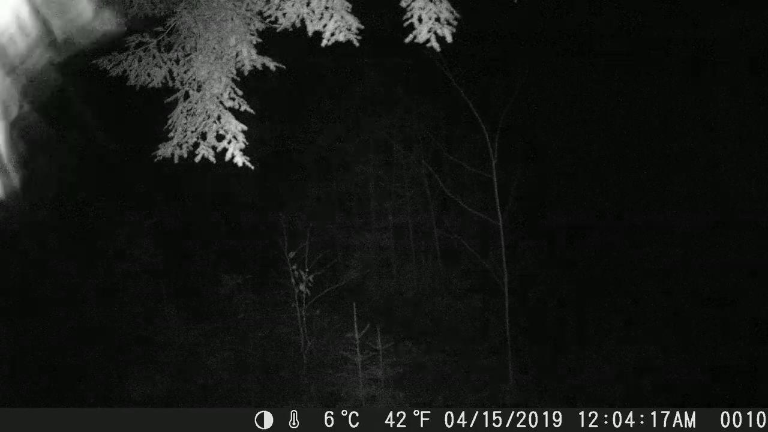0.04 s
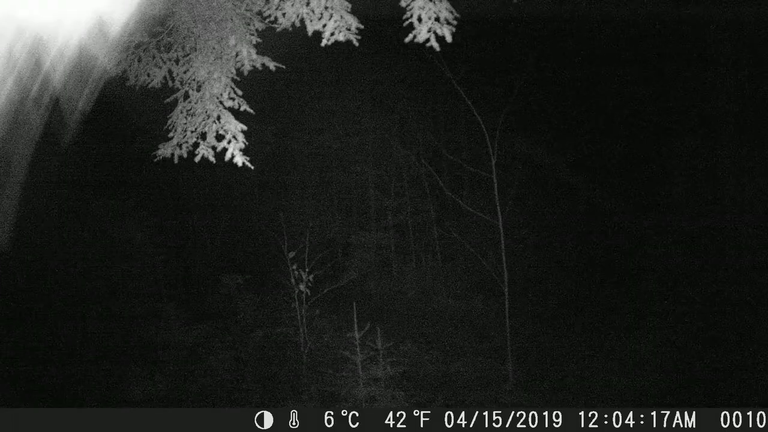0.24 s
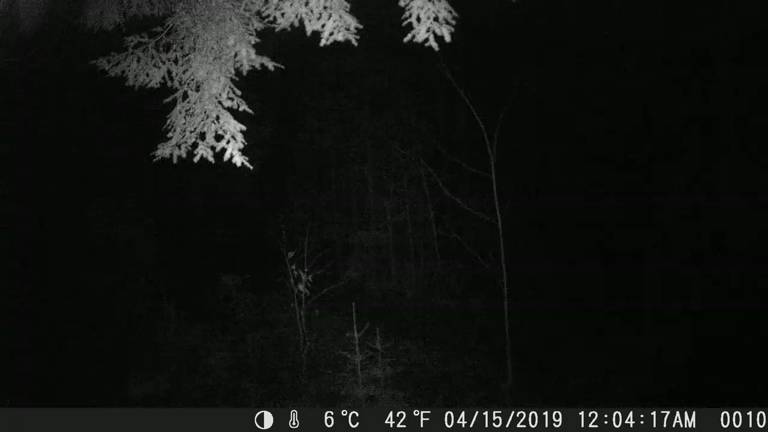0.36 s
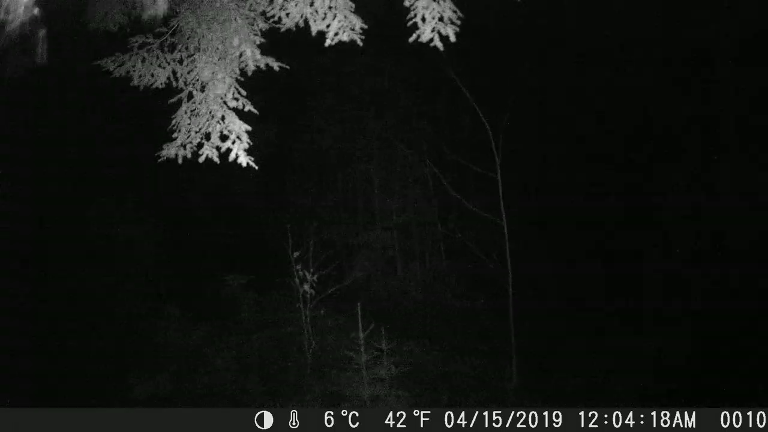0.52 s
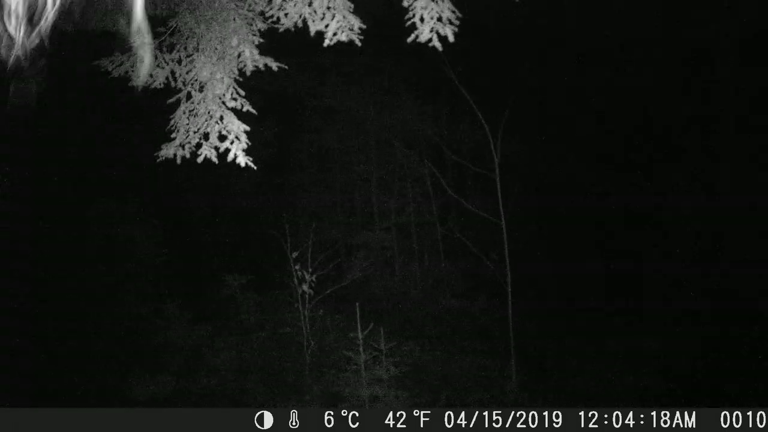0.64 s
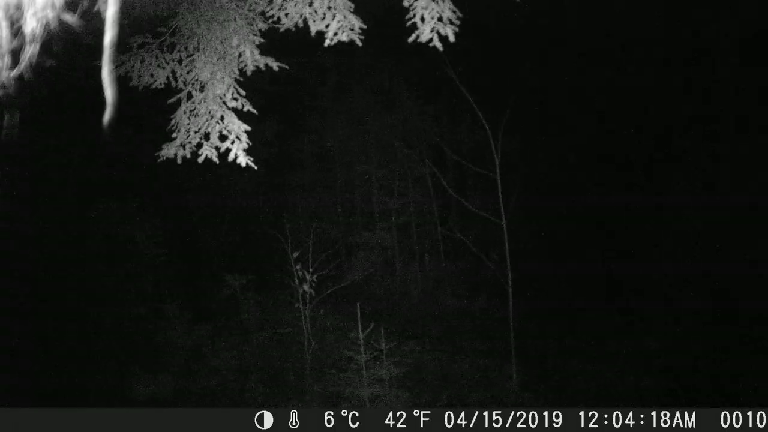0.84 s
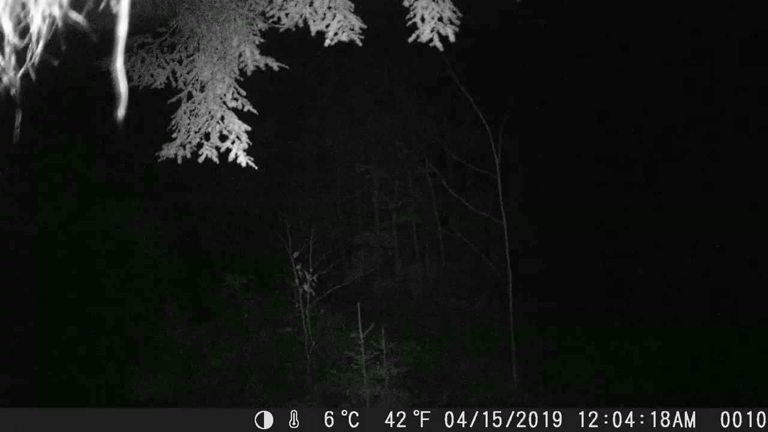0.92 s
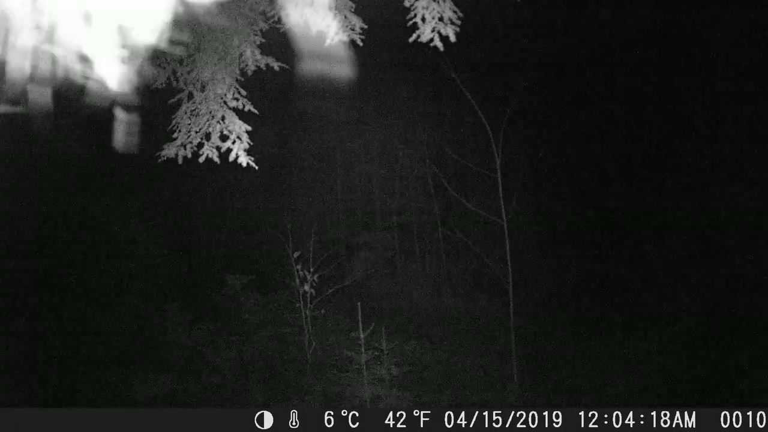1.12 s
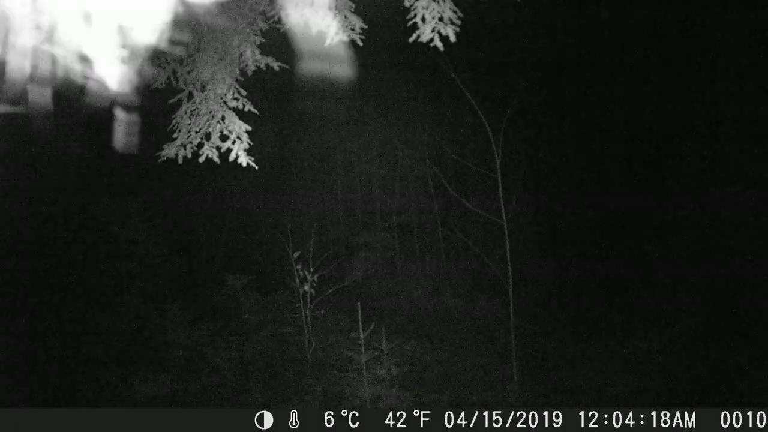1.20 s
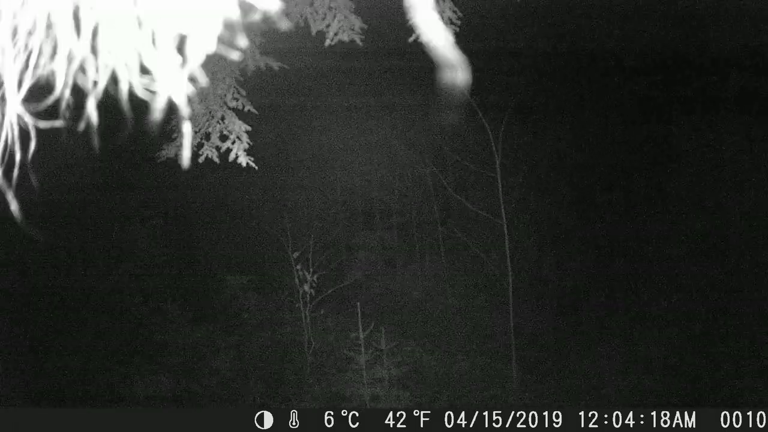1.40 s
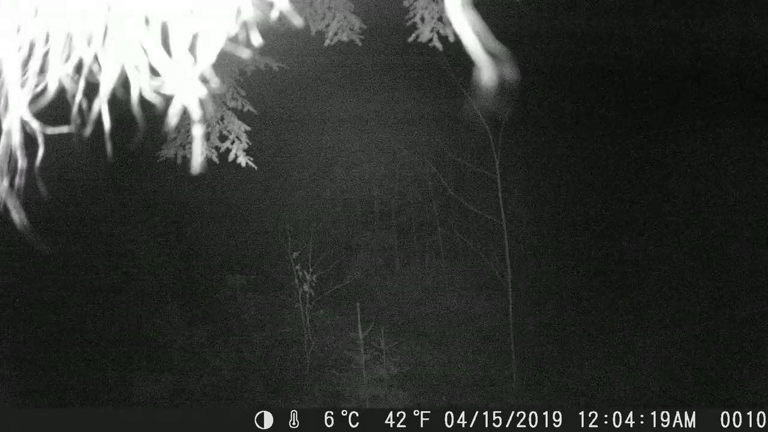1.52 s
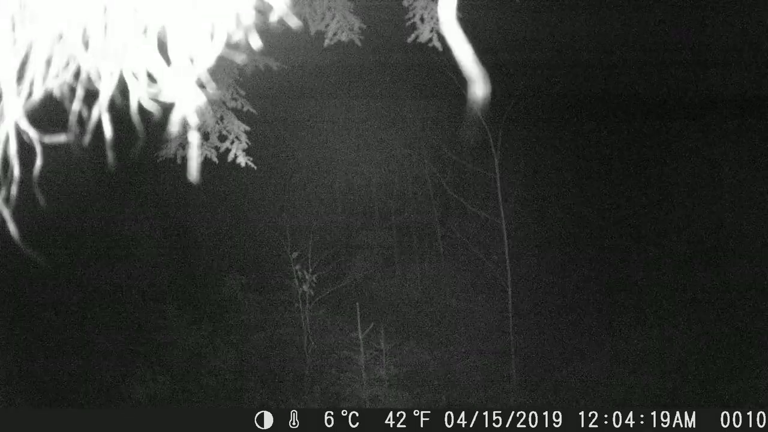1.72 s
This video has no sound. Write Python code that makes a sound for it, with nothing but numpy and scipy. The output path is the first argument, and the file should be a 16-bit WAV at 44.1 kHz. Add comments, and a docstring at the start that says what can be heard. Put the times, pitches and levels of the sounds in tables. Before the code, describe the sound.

An animal rubs its coat on a plastic camera case outdoors at night, very close to the microphone: low shudder, rustle, quick scrapes and tiny squeaks, one heavy thud, then sparse faint hair ticks over rumble and hiss.

```python
"""A low shudder, a soft thud and a rustle of hair come first, then one heavy shove.
An animal rubs its coat along a plastic camera case strapped up outdoors at night, right at the microphone.
Hairs are dense clicks and noise bursts coloured by the case; scrapes ring its resonances, squeaks are sagging
sines. Nudges ring the modes of the mount and the shove is a rising low tone.
Behind them lie a faint rumble of deep noise and the microphone's own hiss."""
import sys
import numpy as np
from scipy import signal
from scipy.fft import rfft, irfft
from scipy.io import wavfile

SR = 44100
rng = np.random.default_rng(int(sys.argv[2]) if len(sys.argv) > 2 else 0)


def digitize_waveform(pressure):
    """Quantize a signal to 16-bit integers and store it at the path in sys.argv[1].

    Rows of a 2-D input are taken as channels; values are limited to [-1, 1].
    """
    field = np.atleast_2d(pressure).T
    bounded = np.clip(field, -1, 1)
    quanta = np.round(bounded * 32767).astype(np.int16)
    wavfile.write(sys.argv[1], SR, quanta)


N = 77175  # samples, 1.75 s

# pressure of the coat on the case: time_s, level_db
RUB_PRESSURE = [(0, -60), (.08, -56), (.145, -50.5), (.17, -53.5), (.225, -49.5), (.265, -41.5),
                (.29, -55.5), (.335, -56), (.385, -63), (.45, -71), (.495, -56.5), (.525, -66), (.6, -64.5),
                (.74, -72.5), (.95, -70), (1.02, -67), (1.09, -63.5), (1.17, -73), (1.23, -69.5),
                (1.255, -59.5), (1.29, -64), (1.32, -70), (1.45, -69.5), (1.485, -61), (1.515, -71.5),
                (1.61, -67), (1.64, -74), (1.75, -72.5)]
# colour of slipping hairs heard through the case: frequency_hz, gain_db
CASE_COLOUR = [(60, -40), (230, -18.5), (340, -9.5), (460, -5), (570, 2.5), (780, -2.5), (1100, 3),
               (1520, 5.5), (1780, -7.5), (2080, 0.5), (2280, -4), (2520, 2), (2850, -5.5), (3200, -15),
               (3500, -9.5), (4400, -24), (5200, -30), (6450, -33), (6950, -24.5), (7500, -37.5),
               (8050, -25.5), (8800, -49.5)]
# level of the swish of the first fast stroke: time_s, level_db
SWISH_LEVEL = [(0, -58.5), (.09, -57), (.12, -52.5), (.148, -46.5), (.172, -54.5), (.22, -67), (.33, -84),
               (.45, -99.5)]
# level of the fine sizzle of hair tips: time_s, level_db
SIZZLE_LEVEL = [(0, -74.5), (.09, -75), (.15, -68), (.2, -77.5), (.245, -67.5), (.275, -60), (.295, -81.5),
                (.34, -78), (.42, -98)]
# colour of the sizzle: frequency_hz, gain_db
SIZZLE_COLOUR = [(5500, -22), (6500, -20), (6900, 8.5), (7500, 2.5), (8050, 1), (8500, -25.5),
                 (9200, -27.5)]
# tufts that snag and let go: start_s, decay_s, level_db, tilt_db_per_octave
SNAGS = [(0.066, 0.0057, -54.5, 10.5), (.1505, 0.00091, -47, -7), (0.1614, 0.00088, -54.5, 4),
         (0.317, 0.015, -44.5, -13.5), (0.334, 0.0027, -60, -10.5), (0.403, 0.0036, -46.5, 3),
         (0.416, 0.0073, -53, 3), (0.461, 0.0015, -54.5, 4.5), (0.4794, 0.01, -58.5, 4.5),
         (.498, 0.0031, -64, 4), (0.532, .004, -53, 2), (0.5566, 0.012, -54.5, -7.5),
         (.623, 0.019, -57.5, -7.5), (.684, 0.0043, -49, -7), (0.774, 0.013, -58, -3.5),
         (0.884, .004, -64.5, 8), (1.1871, 0.0057, -47.5, -0.5), (1.2133, 0.0038, -55, -0.5),
         (1.285, 0.002, -65, 13), (1.3752, 0.0028, -47.5, 1), (1.4931, 0.0016, -58, 1),
         (1.523, 0.0034, -69, 12), (1.643, 0.002, -80, -5)]
# bright crackles of stiff hairs: start_s, decay_s, pitch_hz, level_db
CRACKLES = [(0.401, 0.0025, 3260, -44), (0.486, 0.014, 3500, -61), (.499, 0.0099, 3400, -62),
            (0.531, 0.0038, 3550, -59), (0.574, 0.018, 3520, -70), (.7752, 0.0027, 2430, -54),
            (.988, 0.0096, 7200, -72.5), (1.188, 0.0023, 3400, -61.5), (1.376, 0.0064, 2570, -54)]
# hard scrapes that ring the case: start_s, decay_s, level_db
SCRAPES = [(0.2332, 0.0086, -39.5), (0.2458, 0.012, -35.5), (0.2603, 0.0089, -37), (0.2681, 0.0022, -31.5),
           (0.276, 0.009, -41.5), (0.299, .016, -51)]
# resonances of the case: pitch_hz, width_hz, relative_level_db
CASE_MODES = [(744, 20, 6.5), (919, 18, -1), (1102, 22, 8.5), (1300, 97, -7.5), (1424, 50, -1.5),
              (1560, 70, -12.5), (2272, 110, -8), (2980, 50, -9.5)]
# stick-slip squeaks: start_s, length_s, starting_pitch_hz, share_of_pitch_lost (0-1), level_db
SQUEAKS = [(.0975, .011, 757, 0.22, -36.5), (0.1757, 0.0097, 735, 0.23, -38.5),
           (0.2321, 0.0134, 905, 0.01, -33.5), (0.2361, 0.017, 1093, 0, -29.5),
           (0.2654, 0.012, 1070, 0, -29.5), (1.473, 0.014, 719, .15, -58)]
# soft nudges on the mount: start_s, contact_s, force_db
NUDGES = [(.002, 0.0049, -43.5), (0.1182, 0.0028, -48), (0.1657, 0.0053, -33.5), (0.2129, 0.0039, -30),
          (0.2425, 0.0087, -25.5), (0.2629, 0.0065, -27), (0.344, 0.0086, -36), (.775, 0.0036, -58.5),
          (1.38, 0.0031, -53)]
# ringing modes of the mount: pitch_hz, t60_s, relative_level_db
MOUNT_MODES = [(60.3, .4, -12), (75.3, 0.83, 1), (91.4, .28, 1.5), (128.7, 0.26, 3.5), (193.3, .22, -12.5),
               (211.6, 0.18, -12.5)]
# low shudder of the rubbed mount: time_s, level_db
SHUDDER_LEVEL = [(0, -43), (.14, -46.5), (.3, -40.5), (.45, -65), (.7, -56), (.9, -65.5), (1.05, -55.5),
                 (1.3, -63), (1.42, -56.5), (1.75, -72.5)]
# colour of the shudder: frequency_hz, gain_db
SHUDDER_COLOUR = [(30, -23), (70, 2.5), (100, -1), (135, 4.5), (165, -15.5), (210, -11.5), (280, -35),
                  (600, -68)]
# level of the deep rumble, which swells as the camera sways: time_s, level_db
RUMBLE_LEVEL = [(0, -61), (.2, -45.5), (.32, -38), (.4, -46.5), (.51, -43), (.62, -54), (1.3, -54.5),
                (1.4, -47.5), (1.5, -52), (1.75, -52)]
# colour of the rumble: frequency_hz, gain_db
RUMBLE_COLOUR = [(8, 2), (20, 3.5), (40, -4.5), (70, -11.5), (150, -24), (300, -34), (1000, -61.5)]
# colour of the microphone's hiss: frequency_hz, gain_db
HISS_COLOUR = [(200, 17), (450, 9.5), (600, 8), (800, 0.5), (1500, 16), (1800, -0.5), (2500, -25.5),
               (3200, -29), (3600, -40), (4600, -14), (6400, -14), (7000, -2), (8100, -19), (9000, -43)]

SLIPS_PER_S, SLIP_SPREAD_DB, RUB_FLUTTER_DB = 3200, 2, 3.5
SWISH_HZ, SWISH_WIDTH_HZ = 2500, 310  # width of each of two passes
CRACKLE_WIDTH_HZ = 320  # width of each of two passes
SCRAPE_DRY_DB, SCRAPE_SOFT_HZ = -13.5, 2670  # unringing share; hair cushions pitches above
SQUEAK_JITTER, SQUEAK_FLUTTER_DB, SQUEAK_RISE_S = .075, 0.5, 0.00083  # jitter as a share of pitch
# the shove shakes the mount; its pitch rises as the strap tightens
SHOVE_S, SHOVE_DB, SHOVE_ATTACK_S, SHOVE_HOLD_S, SHOVE_RELEASE_S = .2556, -15.5, 0.011, 0.035, 0.023
SLACK_HZ, TIGHT_HZ, TIGHTEN_S, SHOVE_OCTAVE_DB = 62.4, 98.3, 0.034, -19.5
MOUNT_LOW_HZ = 47  # thuds thin out below
HISS_DB = -71.5
NULL_HZ, NULL_WIDTH_HZ = 3160, 110  # the hollow of the case cancels this pitch
TOP_HZ = 8700


def undb(db):
    """Decibels to gain."""
    return 10 ** (np.asarray(db) / 20)


def unit(x):
    """Scale to rms 1."""
    return x / np.sqrt(np.mean(x ** 2) + 1e-30)


def times():
    """Time of every sample in seconds."""
    return np.arange(N) / SR


def fader(rows):
    """Gain along (time_s, level_db) points."""
    return undb(np.interp(times(), *np.array(rows).T))


def colour(x, points, tilt_db=0):
    """Causal filter through (Hz, dB) points, tilted per octave; keeps the power of white noise."""
    size = 8192
    hz, db = np.array(points, float).T
    octave = np.log2(np.maximum(np.arange(size // 2 + 1) * SR / size, 1))
    tilt = tilt_db * np.clip(octave, np.log2(hz[0]), np.log2(hz[-1]))
    gain = undb(np.interp(octave, np.log2(hz), db) + tilt)
    # folding the cepstrum forward gives minimum phase: no sound ahead of its cause
    cepstrum = irfft(np.log(gain))
    cepstrum[1:size // 2] *= 2
    cepstrum[size // 2 + 1:] = 0
    response = irfft(np.exp(rfft(cepstrum)))
    response = response / np.linalg.norm(response)
    return signal.fftconvolve(x, response)[:len(x)]


def noise(points):
    """Steady coloured noise of rms 1, taken after the filter has settled."""
    return unit(colour(rng.standard_normal(2 * N), points)[N:])


def band(x, hz, width):
    """One resonance, gain 1 at its centre."""
    return signal.lfilter(*signal.iirpeak(hz, hz / width, fs=SR), x)


def walk(rate):
    """Random wander with a spread near 1, through `rate` new points per second."""
    return np.interp(times() * rate, np.arange(N), rng.standard_normal(N))


def burst(start, decay):
    """Sudden start and exponential fall."""
    age = times() - start
    return (age >= 0) * np.exp(-np.maximum(age, 0) / decay)


def slips():
    """Dense tiny clicks of single hairs, of uneven size and either sign, at rms 1."""
    size_db = SLIP_SPREAD_DB * np.minimum(rng.exponential(size=N), 4)
    clicks = undb(size_db) * rng.choice([-1, 1], N)
    return unit(clicks * (rng.random(N) < SLIPS_PER_S / SR))


def coat():
    """Hairs slide over the case, swish on the fast stroke, sizzle at the tips and snag in tufts."""
    pressure = fader(RUB_PRESSURE) * undb(RUB_FLUTTER_DB * walk(120))
    rub = colour(slips() * pressure, CASE_COLOUR)

    swish = band(slips(), SWISH_HZ, SWISH_WIDTH_HZ)
    swish = unit(band(swish, SWISH_HZ, SWISH_WIDTH_HZ)) * fader(SWISH_LEVEL)

    tips = slips() * undb(3 * walk(170))
    sizzle = unit(colour(tips, SIZZLE_COLOUR)) * fader(SIZZLE_LEVEL)

    tufts = rng.standard_normal(N)
    snags = 0
    for start, decay, db, tilt in SNAGS:
        snags = snags + colour(tufts * burst(start, decay) * undb(db), CASE_COLOUR, tilt)
    return rub + swish + sizzle + snags


def crackles():
    """Stiff hairs flick off the edge: short clusters of clicks in narrow bright bands."""
    grains = slips()
    out = 0
    for start, decay, hz, db in CRACKLES:
        cluster = band(grains * burst(start, decay), hz, CRACKLE_WIDTH_HZ)
        out = out + undb(db) * band(cluster, hz, CRACKLE_WIDTH_HZ)
    return out * np.sqrt(SR / 2 / CRACKLE_WIDTH_HZ)  # makes up for the narrow band


def scrapes():
    """Hard contact, cushioned by hair, rings the resonances of the plastic."""
    force = slips() * sum(burst(start, decay) * undb(db) for start, decay, db in SCRAPES)
    cushion = signal.butter(4, SCRAPE_SOFT_HZ, fs=SR, output="sos")
    cushioned = signal.sosfilt(cushion, force)
    ring = sum(undb(db) * band(cushioned, hz, width) for hz, width, db in CASE_MODES)
    return unit(ring) * np.std(force) + undb(SCRAPE_DRY_DB) * colour(force, CASE_COLOUR)


def squeaks():
    """A few uneven stick-slip cycles that die away, most of them sagging in pitch."""
    out, t = 0, times()
    for start, length, start_hz, sag, db in SQUEAKS:
        gone = np.clip((t - start) / length, 0, 1)
        hz = start_hz * (1 - sag * gone) * (1 + SQUEAK_JITTER * walk(1200))
        phase = 2 * np.pi * np.cumsum((t > start) * hz) / SR
        rise = np.clip((t - start) / SQUEAK_RISE_S, 0, 1)
        level = undb(db + SQUEAK_FLUTTER_DB * walk(400))
        out = out + rise * (1 - gone ** 3) * level * np.sin(phase)
    return out


def shove():
    """The one heavy thud: a tone with attack, hold and release, rising as the strap tightens."""
    age = np.maximum(times() - SHOVE_S, 0)
    hz = SLACK_HZ + (TIGHT_HZ - SLACK_HZ) * np.minimum(age / TIGHTEN_S, 1)
    phase = 2 * np.pi * np.cumsum(hz * (age > 0)) / SR
    attack = np.sin(np.pi / 2 * np.minimum(age / SHOVE_ATTACK_S, 1)) ** 2
    release = np.exp(-np.maximum(age - SHOVE_HOLD_S, 0) / SHOVE_RELEASE_S)
    tone = np.sin(phase) + undb(SHOVE_OCTAVE_DB) * np.sin(2 * phase)
    return -undb(SHOVE_DB) * attack * release * tone  # first swing is downward


def mount():
    """Soft nudges ring the mount's decaying modes, and the rubbing keeps it shuddering."""
    t = times()
    force = 0
    for start, contact, db in NUDGES:
        push = np.sin(np.pi * np.clip((t - start) / contact, 0, 1)) ** 2
        force = force + undb(db) * push / push.sum()
    ring = 0
    for hz, t60, db in MOUNT_MODES:
        ring = ring + undb(db) * np.sin(2 * np.pi * hz * t) * np.exp(-np.log(1000) * t / t60)
    low_cut = signal.butter(2, MOUNT_LOW_HZ, "high", fs=SR, output="sos")
    thuds = signal.sosfiltfilt(low_cut, signal.fftconvolve(force, ring)[:N])
    return thuds + noise(SHUDDER_COLOUR) * fader(SHUDDER_LEVEL)


def rumble():
    """Deep noise of the night that swells as the camera sways."""
    return fader(RUMBLE_LEVEL) * noise(RUMBLE_COLOUR)


def hiss():
    """The microphone's own steady coloured noise."""
    return undb(HISS_DB) * noise(HISS_COLOUR)


def scene():
    """All contact sounds close at the microphone, over the night's rumble and the hiss."""
    contact = coat() + crackles() + scrapes() + squeaks() + shove() + mount()
    return (contact + rumble() + hiss())[None]


def record(dry):
    """A hollow in the case notches the treble, and the camera cuts the top."""
    notched = dry - band(dry, NULL_HZ, NULL_WIDTH_HZ)
    top_cut = signal.ellip(8, .2, 70, TOP_HZ, fs=SR, output="sos")
    return signal.sosfilt(top_cut, notched)


dry = scene()
out = record(dry)
digitize_waveform(out)
```